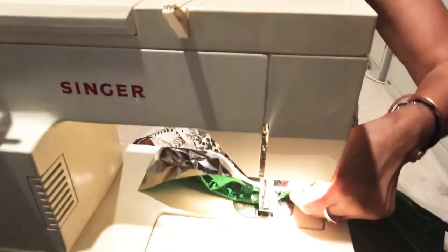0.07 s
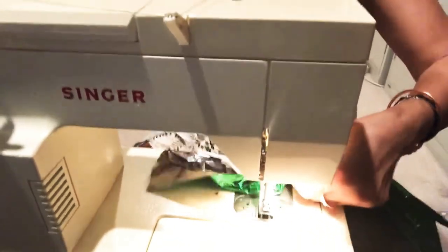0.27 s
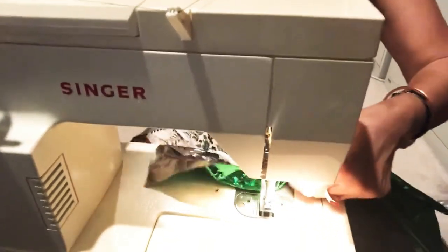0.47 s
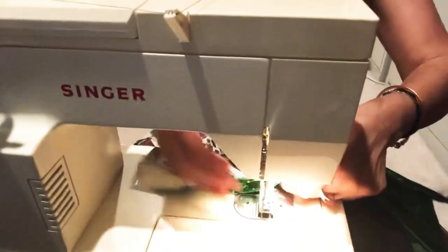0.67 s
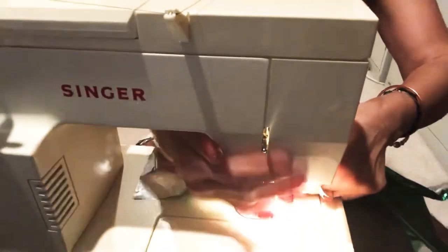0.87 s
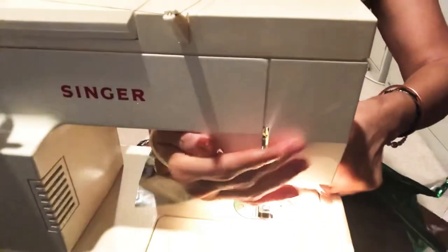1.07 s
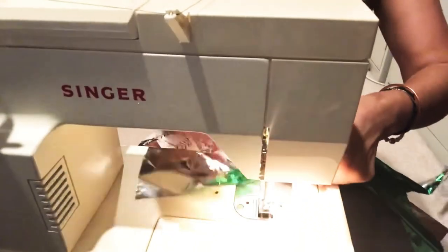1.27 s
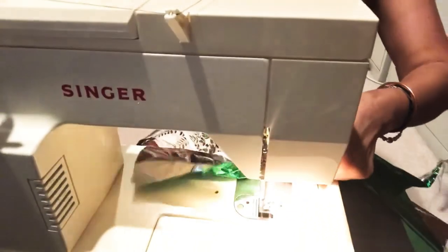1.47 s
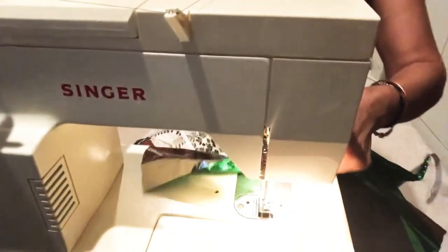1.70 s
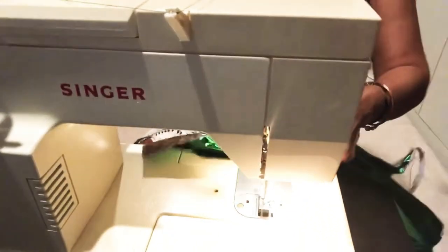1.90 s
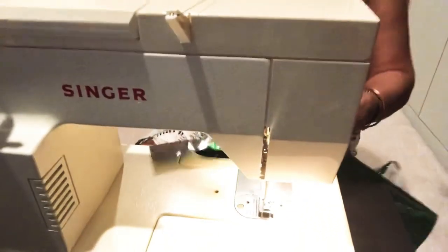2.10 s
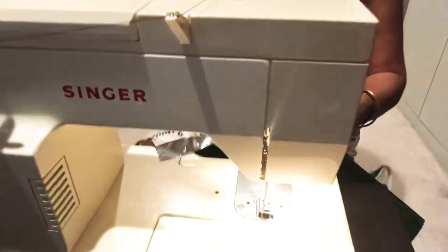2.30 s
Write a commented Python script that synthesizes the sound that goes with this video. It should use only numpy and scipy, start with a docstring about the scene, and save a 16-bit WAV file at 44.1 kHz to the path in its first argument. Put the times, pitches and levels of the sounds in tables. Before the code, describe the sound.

Foil crinkles densely as hands slide it across an idle sewing machine, close by in a small room. Sharper snaps, soft hiss and dull rubbing run throughout, with a few hollow bumps, light plastic clacks and a late metal tink.

```python
"""In a small room, close by, hands push and smooth metallic foil across the bed of a resting sewing machine.
Creases buckle in a dense crackle with louder single snaps; sliding friction gives the sheet a soft hiss
and the hands a dull rumble. A few bumps excite the damped modes of the hollow machine and its table,
plastic parts clack lightly, and something metal tinks twice. Short reflections and faint air surround it."""
import sys
import numpy as np
from scipy import signal
from scipy.fft import rfft, irfft
from scipy.io import wavfile

SR = 44100
rng = np.random.default_rng(int(sys.argv[2]) if len(sys.argv) > 2 else 0)


def inscribe(sig):
    """Save sig as 16-bit PCM at rate SR to the path in sys.argv[1].

    A 1-D sig is mono; a 2-D sig holds one channel per row.
    Samples are clipped to [-1, 1] before scaling.
    """
    pcm = np.round(np.clip(np.atleast_2d(sig).T, -1, 1) * 32767)
    wavfile.write(sys.argv[1], SR, pcm.astype(np.int16))


N = 108045
TOP_HZ = 16000

def amp(db):
    """Amplitude ratio of a level in decibels."""
    return 10 ** (np.asarray(db) / 20)

def unit(x):
    """Normalisation to unit energy."""
    return x / np.sqrt(np.sum(x ** 2) + 1e-18)

def add(out, start, x):
    """Superposition of a sound at a time in seconds."""
    i = max(int(start * SR), 0)
    out[i:i + len(x)] += x[:max(len(out) - i, 0)]

def envelope(points):
    """Amplitude envelope, linear in decibels between points."""
    when, db = np.array(points).T
    return amp(np.interp(np.arange(N) / SR, when, db))

def colour(x, points):
    """Minimum-phase filtering through (f/Hz, level/dB) points, conserving the power of white noise."""
    hz, db = np.array(points, float).T
    size = 4096
    log_hz = np.log(np.fft.rfftfreq(size, 1 / SR) + 1)
    cepstrum = irfft(np.log(amp(np.interp(log_hz, np.log(hz), db))))
    cepstrum[1:size // 2] *= 2
    cepstrum[size // 2 + 1:] = 0
    return signal.fftconvolve(x, unit(irfft(np.exp(rfft(cepstrum)))))[:len(x)]

def ring(hz, t60, rise_s):
    """Damped harmonic oscillation with a smooth onset."""
    t = np.arange(SR // 2) / SR
    return np.sin(2 * np.pi * hz * t) * np.exp(-np.log(1000) * t / t60) * (1 - np.exp(-(t / rise_s) ** 2))

# Spectrum of the room air: f/Hz, relative level/dB
AIR_SPECTRUM = [(20, -13), (50, 3), (120, -0.5), (300, -7), (1000, -3.5), (2000, -7.5), (6000, -12),
                (16000, -44.5)]
def air():
    """Stationary ambient noise, strongest in the bass."""
    return amp(-61.5) * colour(rng.standard_normal(N), AIR_SPECTRUM)

def room(x):
    """Early reflections from the machine's arm and bed precede the room's diffuse reverberation."""
    t = np.arange(SR // 2) / SR
    def tail(t60, gap_s):
        return unit(rng.standard_normal(len(t)) * np.exp(-np.log(1000) * t / t60) * (t > gap_s))
    early = signal.sosfilt(signal.butter(2, 900, "high", fs=SR, output="sos"), tail(0.017, gap_s=0.00067))
    late = signal.sosfilt(signal.butter(1, 7000, fs=SR, output="sos"), tail(0.26, gap_s=0.0052))
    return signal.fftconvolve(x, amp(-14.5) * early + amp(-15.5) * late)[:N]

# Strength of the rubbing: t/s, level/dB
RUB_LEVELS = [(0, -59), (.06, -44), (.13, -51), (.22, -46.5), (.32, -50.5), (.46, -67), (.58, -56),
              (.72, -66), (.82, -63), (.90, -47.5), (1.0, -62), (1.06, -78), (1.16, -43.5), (1.22, -54.5),
              (1.32, -52), (1.45, -63.5), (1.56, -66), (1.68, -55.5), (1.76, -56), (1.88, -49), (2.0, -60),
              (2.18, -48), (2.28, -55.5), (2.45, -50.5)]
# Spectrum of the rubbing: f/Hz, relative level/dB
RUB_SPECTRUM = [(30, -6), (70, -14), (115, -1.5), (160, -0.5), (230, -4.5), (360, 0.5), (580, -1),
                (800, 0.5), (1080, -1.5), (1500, -8.5), (3000, -29), (16000, -23.5)]
def rubbing():
    """Sliding friction of the hands drives the hollow bed into a dull rumble."""
    return envelope(RUB_LEVELS) * colour(rng.standard_normal(N), RUB_SPECTRUM)

# Soft pushes on the bed: t/s, level/dB, f/Hz
NUDGES = [(0.051, -35, 344), (.085, -36.5, 143), (0.638, -33.5, 242), (0.699, -37, 190), (0.771, -47, 204),
          (.885, -32.5, 126), (.925, -36, 134), (.985, -31.5, 135), (0.989, -23, 334), (1.262, -37, 393),
          (1.311, -43, 118), (1.386, -43.5, 116), (1.844, -34, 397), (1.877, -32.5, 248),
          (2.054, -35.5, 242), (2.216, -39, 343), (2.381, -34, 247)]
def nudges():
    """Soft contact excites only low frequencies: one damped mode for each push of the hand."""
    out = np.zeros(N)
    for start, db, hz in NUDGES:
        add(out, start, amp(db) * ring(hz, t60=0.064, rise_s=0.0062))
    return out

# Metal contacts: t/s, level/dB
TINKS = [(2.1535, -28), (2.3546, -49)]
# Modes of the metal: f/Hz, relative level/dB, T60/s
METAL_MODES = [(4760, -6, 0.014), (5600, -10, 0.043), (7600, 3.5, 0.023), (8040, -3, 0.029)]
def tinks():
    """Small metal rings touch and vibrate in high, heavily damped modes."""
    out = np.zeros(N)
    for start, db in TINKS:
        for hz, mode_db, t60 in METAL_MODES:
            add(out, start, amp(db + mode_db) * ring(hz, t60, rise_s=0.0006))
    return out

# Plastic contacts: t/s, relative level/dB, f/Hz
CLACKS = [(.043, -34, 900), (.094, -36, 837), (.097, -34.5, 1397), (.192, -35.5, 770), (0.228, -30, 990),
          (.754, -36, 770), (.893, -39, 1230), (1.144, -26.5, 1010), (1.628, -26.5, 1127),
          (1.778, -36, 1020), (2.089, -34.5, 1015), (2.148, -29, 867), (2.158, -25.5, 776),
          (2.2337, -29, 1013), (2.299, -36.5, 1020), (2.338, -39.5, 1130), (2.368, -39, 976),
          (2.413, -42, 1070), (2.435, -37.5, 1070)]
# Modes of a plastic part: frequency ratio, relative level/dB, T60/s
PLASTIC_MODES = [(0.719, -4.5, 0.039), (0.911, 3, 0.056), (1.028, 2, 0.064), (1.14, -4.5, 0.045),
                 (2.2, -10, 0.02)]
def clacks():
    """Light impacts excite inharmonic modes of the plastic parts, slightly detuned each time."""
    out = np.zeros(N)
    for start, db, hz in CLACKS:
        detunings = 1 + 0.013 * rng.standard_normal(len(PLASTIC_MODES))
        for (ratio, mode_db, t60), detune in zip(PLASTIC_MODES, detunings):
            gain = amp(db + mode_db) * rng.choice([-1, 1]) / 2
            add(out, start, gain * ring(hz * ratio * detune, t60, rise_s=0.00079))
    return out

# Hand impacts: t/s, body level/dB, tilt above 340 Hz/(dB per octave), table level/dB
BUMPS = [(0.2562, -3, 0, -30), (.9885, -31, -15, -48), (1.0900, -14, -5, -42), (1.627, -25, 4.5, -44),
         (2.163, -25.5, 3.5, -70)]
# Modes of the hollow machine: f/Hz, relative level/dB, T60/s
BODY_MODES = [(148.5, -18, 0.094), (269, -19.5, 0.054), (355, 3, 0.026), (350.6, -17.5, .15),
              (404, -0.5, 0.032), (752, -6.5, 0.027), (860, -25, 0.098), (1164, -11.5, 0.029),
              (1275, -27, 0.042), (1940, -26, 0.034), (2350, -30, 0.028)]
def bumps():
    """Impact sets the hollow body into free vibration; the table beneath booms just after."""
    contact_s = 0.0011
    out = np.zeros(N)
    for start, db, tilt, table_db in BUMPS:
        add(out, start + 0.0098, amp(table_db) * ring(hz=54.7, t60=0.2, rise_s=0.0054))
        for hz, mode_db, t60 in BODY_MODES:
            gain = amp(db + mode_db + tilt * max(np.log2(hz / 340), 0))
            add(out, start, gain * ring(hz, t60, rise_s=contact_s + 1 / hz))
    return out

# Spectrum of the sliding sheet: f/Hz, relative level/dB
SLIDE_SPECTRUM = [(40, -24), (130, 1), (350, 1), (600, 6), (900, -7.5), (1500, 5.5), (4500, 8.5), (8000, 5),
                  (12000, 0), (16000, -22)]
def sliding(effort):
    """Friction between sheet and bed radiates broadband noise, its amplitude proportional to effort."""
    return amp(-4.5) * effort * colour(rng.standard_normal(N), SLIDE_SPECTRUM)

def buckle(hz, decay_ms):
    """Snap-through buckling of one facet: a noise burst with faint ringing, the treble dying first."""
    size, width_oct = 2048, 1.4
    t = np.arange(size) / SR
    octaves = np.log2((np.fft.rfftfreq(size, 1 / SR) + 1) / hz)
    spectrum = rfft(rng.standard_normal(size)) / np.sqrt(1 + (2 * octaves / width_oct) ** 2)
    spectrum *= amp(-1.5 * np.maximum(octaves - 0.64, 0))  # steeper upper skirt
    treble_share = 1 / (1 + np.exp(-4 * (octaves - .5)))
    mode_hz = np.minimum(hz * 2 ** (.5 * rng.standard_normal((4, 1))), TOP_HZ)
    rings = np.sin(2 * np.pi * mode_hz * t).sum(axis=0)
    age = t * 1000 / decay_ms
    fade = np.exp(-age) * (1 - np.exp(-age / 0.072))
    burst = irfft(spectrum * (1 - treble_share)) + irfft(spectrum * treble_share) * np.exp(-.3 * age)
    return unit(unit(burst * fade) + 0.14 * unit(rings * fade))

def crackle(effort):
    """Small creases buckle as a random point process whose rate and amplitude grow with effort."""
    candidates, spread_db, spread_oct = 1200, 5.5, 0.86
    chance = rng.random((candidates, 2))
    scatter = np.clip(rng.standard_normal((candidates, 3)), -2, 2)
    grains = np.zeros(N)
    for k, ((jitter, draw), (size, pitch, length)) in enumerate(zip(chance, scatter)):
        start = (k + 4 * jitter) % candidates / candidates * N / SR
        grain = buckle(hz=5490 * 2 ** (spread_oct * pitch), decay_ms=1.66 * np.exp(0.58 * length))
        rate_per_s = 520 * (effort[int(start * SR)] / effort.mean()) ** 0.36
        if draw < rate_per_s * N / SR / candidates:
            add(grains, start, amp(spread_db * size) * grain)
    return amp(-1.5) * effort * grains / grains.std()

# Large creases: t/s, relative level/dB, centre f/Hz, decay time/ms
SNAPS = [(0.022, -35.5, 5700, 1.2), (0.0415, -28.5, 4070, 3.4), (0.075, -38, 7000, 1.8),
         (.093, -37, 6070, 3.5), (0.1403, -40, 10900, 1.2), (.146, -36, 2820, 5), (0.178, -44, 9000, 2),
         (0.2119, -32, 9150, 2.2), (.225, -25, 8900, 4.9), (0.279, -36, 4550, 3.6),
         (.461, -37.5, 3900, 7.2), (0.5063, -36, 5800, 2.9), (0.55, -39.5, 3500, 2.1),
         (0.572, -38, 7000, 1.3), (.587, -35, 8040, 4.8), (.604, -33.5, 7460, 1.2),
         (0.6143, -38, 5000, 2.4), (0.622, -40, 3880, 1.4), (.664, -41.5, 8100, 1.3),
         (0.7027, -31, 5940, 10), (0.7135, -28.5, 6740, 8), (0.7349, -39.5, 4540, 3),
         (.752, -31.5, 6000, 5), (0.773, -33, 6440, 3.1), (.795, -34, 4970, 3), (.858, -31.5, 6540, 2.1),
         (0.812, -36, 6400, 1.2), (.897, -46, 3000, 4.3), (0.9456, -36, 4570, 2.4),
         (0.9876, -25.5, 4100, 5), (1.014, -25.5, 4840, 4.5), (1.073, -38, 6640, 1.1),
         (1.093, -36.5, 7400, 1.4), (1.1362, -27, 4800, 3.6), (1.144, -29, 3940, 5),
         (1.2658, -31.5, 5000, 4.3), (1.32, -32.5, 4900, 4.5), (1.34, -35, 4760, 2.7),
         (1.363, -34, 4700, 3.8), (1.479, -41.5, 5060, 3), (1.5402, -32.5, 6100, 4),
         (1.571, -47, 4930, 1.8), (1.597, -36.5, 2330, 4.2), (1.6618, -39.5, 2900, 1.9),
         (1.7266, -34, 3500, 3.2), (1.777, -34, 6140, 4.1), (1.848, -36.5, 2970, 6.4),
         (1.872, -35.5, 7550, 5.1), (1.899, -37.5, 4070, 2), (1.9654, -36.5, 4080, 1.1),
         (1.997, -37.5, 5460, 4), (2.1332, -37, 8400, 2.3), (2.145, -39, 3970, 17), (2.154, -29, 4300, 3.3),
         (2.158, -27, 2250, 7.2), (2.232, -39, 3100, 5.8), (2.2971, -42, 4950, 0.4),
         (2.331, -40, 7000, 1.9), (2.355, -39, 4800, 5.2)]
def snaps():
    """Large creases release their stored elastic energy in single transients."""
    out = np.zeros(N)
    for start, db, hz, decay_ms in SNAPS:
        add(out, start, amp(db) * np.sqrt(SR / 500) * buckle(hz, decay_ms))
    return out

# How hard the sheet is worked: t/s, level/dB
EFFORT = [(0, -50.5), (.035, -52), (.06, -45), (0.101, -44.5), (.125, -63), (.15, -48), (.19, -41),
          (.225, -39.5), (.25, -39), (.29, -35.5), (.33, -47.5), (.385, -50.5), (.445, -53), (.47, -51.5),
          (.53, -49.5), (.605, -44.5), (.64, -49.5), (.695, -47.5), (.71, -41), (.78, -37), (.84, -45.5),
          (.90, -42.5), (.97, -45), (1.02, -51.5), (1.055, -50.5), (1.10, -45), (1.12, -54), (1.144, -36.5),
          (1.175, -42.5), (1.24, -46), (1.27, -42.5), (1.35, -43), (1.39, -51.5), (1.47, -55.5),
          (1.485, -50.5), (1.58, -46.5), (1.62, -53), (1.67, -48), (1.75, -50.5), (1.82, -48), (1.87, -45),
          (1.93, -46.5), (2.0, -41), (2.06, -46.5), (2.125, -49), (2.155, -41.5), (2.19, -45),
          (2.26, -54.5), (2.38, -54.5), (2.412, -45), (2.45, -54)]
# Response of the sheet: f/Hz, relative level/dB
FOIL_RESPONSE = [(100, -43.5), (300, 13.5), (800, 6), (1400, 3.5), (2500, 0.5), (4000, -1), (7900, -1),
                 (9000, -2.5), (12500, 0.5), (16000, -4)]
def foil():
    """Source and filter: the sheet's response colours its buckling, and friction adds hiss."""
    effort = envelope(EFFORT)
    return colour(crackle(effort) + snaps(), FOIL_RESPONSE) + sliding(effort)

def scene():
    """Superposition of direct sound, ambient noise and reflections."""
    direct = foil() + rubbing() + tinks() + bumps() + clacks() + nudges()
    return (direct + air() + room(direct))[None]

def record(dry):
    """Band limiting removes the deepest bass and the highest treble."""
    dry = signal.sosfilt(signal.butter(2, 32, "high", fs=SR, output="sos"), dry)
    return signal.sosfilt(signal.ellip(10, .2, 70, TOP_HZ, fs=SR, output="sos"), dry)

dry = scene()
out = record(dry)
inscribe(out)
```